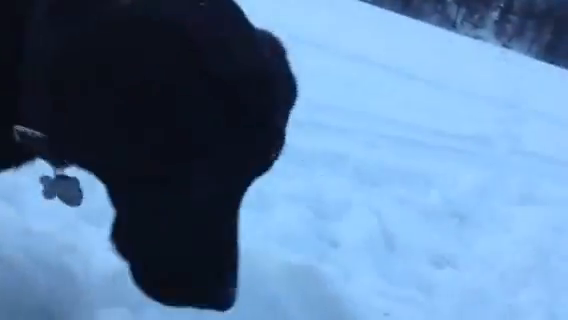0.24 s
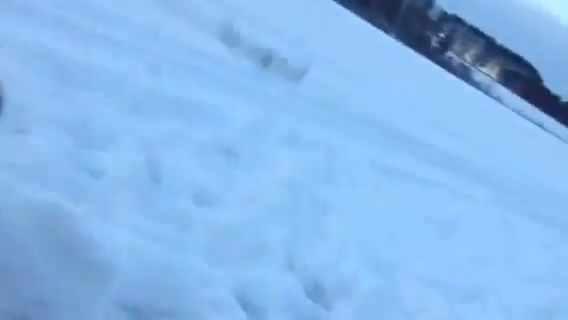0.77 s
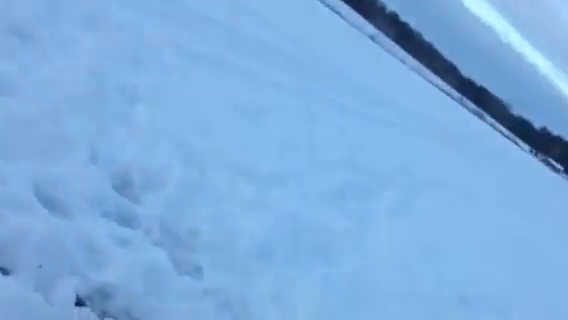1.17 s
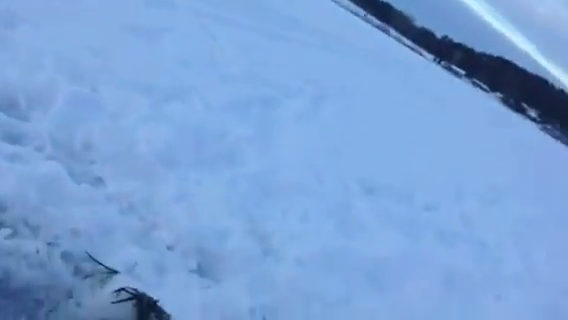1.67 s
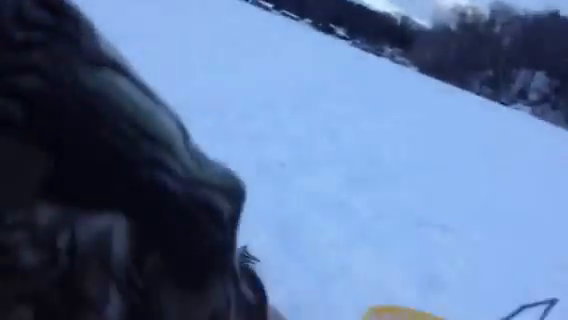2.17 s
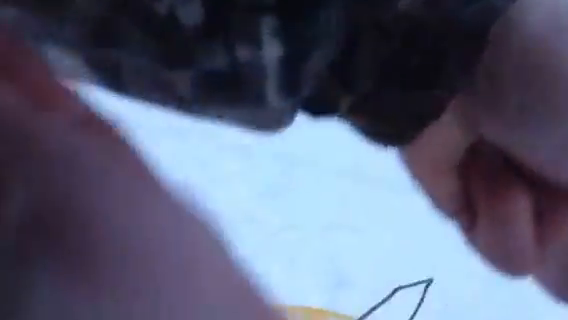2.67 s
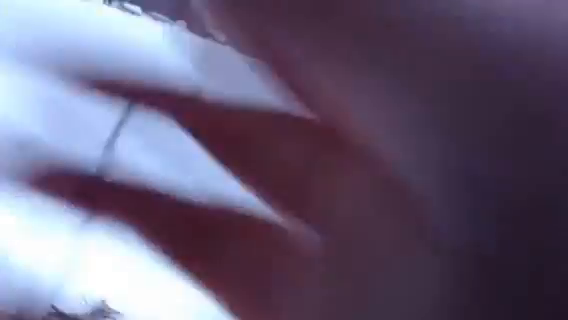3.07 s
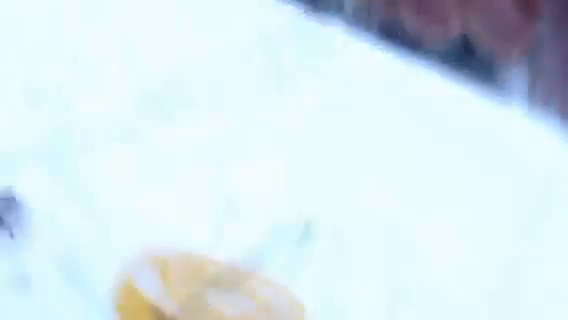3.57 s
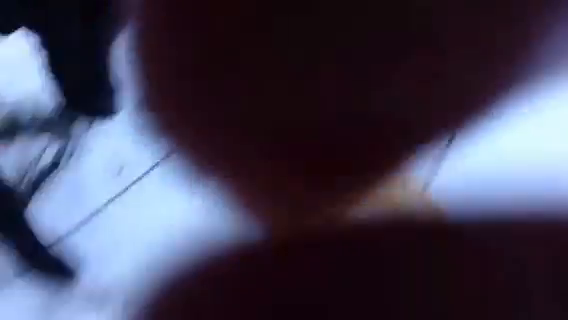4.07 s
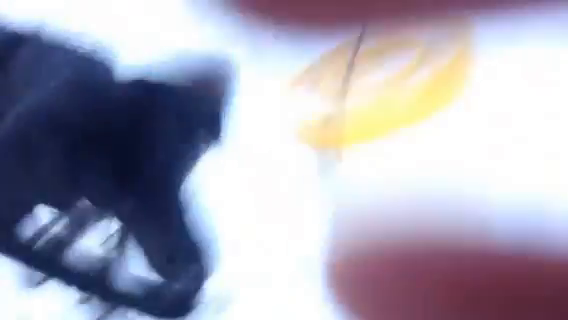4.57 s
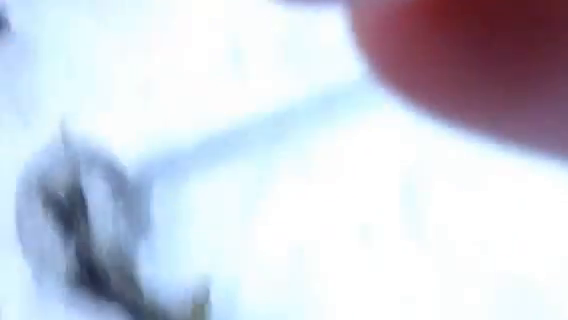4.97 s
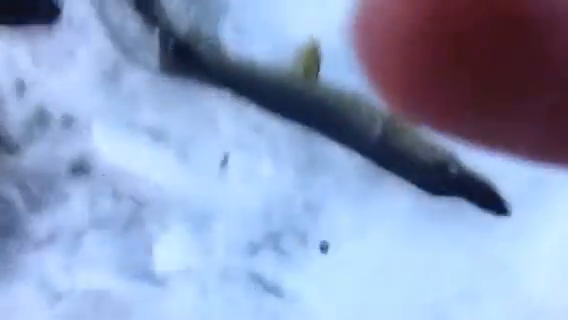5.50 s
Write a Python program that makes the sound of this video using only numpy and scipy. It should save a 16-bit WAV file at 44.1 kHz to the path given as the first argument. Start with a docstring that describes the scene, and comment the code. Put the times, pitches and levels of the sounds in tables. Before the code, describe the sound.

Fingers click and knock on a handheld camera over crunching, squeaking snow, while a dog's collar tags chink now and then.

```python
"""Crusty snow and dog tags

Someone shifts about on crusty snow with a small camera in hand, a dog close by.
Snow crushes in grains of five sizes, snaps and squeaks. Fingers click and knock on the
camera shell, a sleeve drags, and two metal tags on the dog's collar chink now and then."""
import sys
import numpy as np
from scipy import signal
from scipy.fft import rfft, irfft
from scipy.io import wavfile
from scipy.ndimage import uniform_filter1d

SR = 44100
rng = np.random.default_rng(int(sys.argv[2]) if len(sys.argv) > 2 else 0)


def generate_wav(sig):
    """Save sig (samples, or channels by samples) to the path in sys.argv[1] as 16-bit PCM at SR."""
    pcm = np.round(np.clip(np.atleast_2d(sig).T, -1, 1) * 32767).astype(np.int16)
    wavfile.write(sys.argv[1], SR, pcm)


N = 253134


def snow():
    """Snow crushes as clods, crust, coarse crystals, fine crystals and powder."""
    # the five grain sizes: first_hz, last_hz, cycles, grains_per_s, spread_db, clump_db
    sizes = [(184.4, 722, 1.06, 1200, 4, 0), (700, 2770, 5.7, 3000, 1, 2.5),
             (2500, 3880, 0.83, 5000, 1, 1.5), (5060, 7770, 5.7, 16000, -2, 3.5),
             (9000, 7000, 0.8, 8400, 3, 2)]
    # how the four smaller sizes blend the coarse and fine levels: fine_share, offset_db
    blends = [(.02, -0.5), (.45, -2), (.9, -2), (1.2, -3)]
    # the top hiss, duller while fingers lie near the microphone: time_s, offset_db
    powder = [(0, 1.5), (1.4, 1), (1.6, -2.5), (1.9, 0.5), (3.0, -1.5), (3.85, 3), (4.1, -2), (4.55, -3),
              (4.8, 4), (5.74, -1)]
    clods, coarse, fine = crush_levels()
    levels = [clods] + [coarse + share * (fine - coarse) + db for share, db in blends]
    levels[-1] += along(powder)[0]
    return sum(gain_of(db) * grains(*size) for db, size in zip(levels, sizes))


def crush_levels():
    """Clod, coarse and fine levels in dB: at each crunch the crust gives way quickly and settles."""
    # rustle between the crunches: time_s, clods_db, coarse_db, fine_db
    rustle = [(0.0, -51, -35.5, -48), (0.22, -53.5, -40, -53), (0.65, -49.5, -46.5, -51.5),
              (0.88, -50.5, -42.5, -54.5), (1.07, -38, -36.5, -47), (1.53, -45, -47.5, -45),
              (1.74, -46.5, -48.5, -51.5), (1.95, -49, -41.5, -53.5), (2.22, -41, -43.5, -46),
              (2.51, -49.5, -44.5, -51.5), (3.1, -53, -47, -45), (3.34, -49, -39, -37.5),
              (3.71, -42, -43.5, -48), (3.88, -59.5, -45.5, -50.5), (4.12, -49, -44.5, -49),
              (4.27, -49, -38.5, -44), (4.46, -34, -33, -43), (4.59, -62, -58.5, -64),
              (5.1, -75.5, -60, -71.5), (5.74, -58, -52, -56.5)]
    # single crunches and rubs: start_s, hold_s, clods_db, coarse_db, fine_db
    crunches = [(0, 0.016, -50, -34.5, -48), (0.116, 0.066, -37, -33, -39), (0.222, 0.092, -60, -43, -54),
                (0.389, 0.1, -59, -33, -46), (0.707, 0.085, -60, -62, -53),
                (0.846, 0.18, -38.5, -34.5, -47), (.97, 0.057, -39, -30.5, -34),
                (1.053, 0.14, -49, -36.5, -59), (1.26, 0.036, -37.5, -39, -41), (1.34, .095, -46, -41, -42),
                (1.5, 0.054, -44, -47, -39), (1.587, 0.099, -47, -47, -44),
                (1.693, 0.079, -41.5, -37.5, -49), (1.95, 0.056, -49, -55, -40.5),
                (2.037, 0.044, -50, -40.5, -36), (2.202, 0.087, -45, -42.5, -37.5),
                (2.338, 0.069, -67, -60, -40), (2.417, .055, -61, -46, -39), (2.594, .03, -48, -46, -48),
                (2.67, 0.056, -47, -45.5, -37.5), (2.734, 0.061, -51, -36, -36.5),
                (3.012, 0.1, -58, -43, -64), (3.114, .15, -64, -54, -36), (3.286, 0.11, -47, -51, -34),
                (3.428, 0.18, -56, -42, -39.5), (3.673, 0.059, -53.5, -34, -36.5),
                (3.797, 0.1, -49, -50, -36), (4.077, .14, -39.5, -39, -41.5),
                (4.248, 0.11, -42, -46.5, -38.5), (4.343, 0.15, -43.5, -59, -37),
                (4.49, 0.11, -37, -40.5, -35.5), (4.566, 0.014, -29, -42, -30.5),
                (4.742, 0.11, -48.5, -58, -57), (5.01, 0.017, -80, -76, -69), (5.287, 0.023, -58, -68, -68),
                (5.514, .04, -53, -60, -68), (5.687, 0.063, -49, -45.5, -40)]
    attack_s, release_db_per_s = 0.0097, 517
    t = np.arange(N) / SR
    power = gain_of(along(rustle)) ** 2
    for start, hold, *db in crunches:
        rise = np.clip((t - start) / attack_s, 0, 1)
        fall = gain_of(-release_db_per_s * np.maximum(t - start - hold, 0))
        power += (gain_of(db)[:, None] * rise * fall) ** 2
    return 10 * np.log10(power)


def grains(first_hz, last_hz, cycles, per_s, spread_db, clump_db, count=14):
    """Bonds in the snow break: short fading waves at random times, most small, in clumps."""
    clumps = wobble(N, 300)
    size = gain_of(spread_db * np.minimum(rng.exponential(1, N), 5)) * rng.choice([-1, 1], N)
    breaks = size * (rng.random(N) < per_s / SR) * gain_of(clump_db * clumps)
    kind, out = rng.integers(0, count, N), np.zeros(N)
    for k, hz in enumerate(np.geomspace(first_hz, last_hz, count)):
        turns = np.arange(0, 3 * cycles, hz / SR)
        wave = np.sin(2 * np.pi * turns) * np.exp(-2 * turns / cycles) * (1 - np.exp(-3 * turns))
        out += signal.oaconvolve(breaks * (kind == k), wave / np.linalg.norm(wave))[:N]
    return evened(band(out, first_hz * 1.154, last_hz * 2))


def snaps(per_s):
    """Small snaps at random times and pitches, louder when the coarse crunch is loud."""
    when, pitch, size = rng.random((round(per_s * N / SR), 3)).T
    levels = crush_levels()[1][(when * N).astype(int)] + 8.5 - 2 * np.log(size + 0.03)
    rows = [(start, db, hz, 0.69, db - 13, db - 27, 0.66)
            for start, db, hz in zip(when * N / SR, levels, 1500 * 4 ** pitch)]
    return played(rows, click, size=600)


def click(db, hz, ms, dull_db, bright_db, noisy, noise):
    """A quick ring with a rattle around it, a dull push below and a tick above."""
    t = np.arange(len(noise)) / SR
    force, noisy = contact(t, ms), np.clip(noisy, 0, 1)
    tone = np.sin(2 * np.pi * hz * t) * force
    tone += 0.13 * np.sin(2 * np.pi * hz * 0.835 * t) * contact(t, 3.9 * ms)
    rattle = band(noise * force, 1320, 5270)
    ring = peaked((1 - noisy) * peaked(tone) + noisy * peaked(rattle))
    dull = per_burst(band(noise * force, 290, 1570))
    tick = band(noise * contact(t, 0.77 * ms), 5830, 12900)
    bright = per_burst(band(tick, 3300, 16500))
    return gain_of(db) * ring + gain_of(dull_db) * dull + gain_of(bright_db) * bright


def knock(db, hz, thud_db, noise):
    """A soft blow through the hand: a few rough cycles over a faint, low thud."""
    t = np.arange(len(noise)) / SR
    rough = 0.5 * evened(band(noise, hz * 0.19, hz * 2.17))
    force = contact(t, ms=800 / hz)  # rises for 0.8 of a cycle
    blow = peaked(band(force * (np.sin(2 * np.pi * hz * t) + rough), hz / 2, hz * 5))
    thud = contact(t, ms=3.3) * np.sin(2 * np.pi * 90 * t)
    return gain_of(db) * blow + gain_of(thud_db) * thud


def fingers():
    """Fingers click and knock on the camera shell; some clicks are snapping crust."""
    # clicks: start_s, ring_db, pitch_hz, contact_ms, dull_db, bright_db, noisy_share
    clicks = [(0.0164, -14.5, 2490, 1.24, -37, -36, 0.65), (0.0635, -43, 2340, 1.05, -50, -57, 0.5),
              (0.099, -22, 2740, 0.86, -32, -48, 0.4), (0.1268, -15.5, 2370, 0.81, -35, -50, 0.5),
              (0.1356, -22, 1750, 0.7, -34, -27.5, 0.3), (0.177, -13, 1830, 0.74, -43, -48, 0.56),
              (0.218, -28, 4600, 1.05, -40, -34, 0.5), (0.2303, -16, 2700, 0.93, -37, -41, 0.85),
              (0.2695, -13.5, 1503, 1.05, -33, -60, 0.57), (0.285, -25, 1890, 1.05, -44, -55, 0.4),
              (0.4165, -23, 2400, 0.91, -34, -37, 0.8), (0.4524, -11.5, 1890, 1.05, -36, -48, 0.59),
              (0.4764, -14.5, 1900, 1.2, -32, -35, 0.8), (0.5277, -34, 1440, 1.7, -42, -39, 0.5),
              (0.5509, -2.5, 4530, 0.59, -38, -28, 0.3), (0.5608, -21.5, 3070, 1.6, -38, -49, 0.55),
              (0.6758, -39, 1480, 0.87, -58, -37, 0.4), (0.7158, -17.5, 6070, 0.61, -48, -42, 0.4),
              (0.7207, -28, 6860, 1.05, -46, -30.5, 0.4), (0.7528, -24, 5280, 0.61, -54.5, -45, 0.57),
              (0.8411, -27, 1810, 1.3, -45, -36, 0.55), (0.9288, -20.5, 3790, 0.53, -38, -51, 0.3),
              (1.0355, -19, 1530, 1.3, -31, -45, 0.4), (1.072, -30, 2720, 1.05, -27.5, -51, 0.4),
              (1.1506, -31, 1830, 1.2, -45, -56, 0.3), (1.1646, -17, 1900, 0.97, -27.5, -57, 0.3),
              (1.1732, -22, 2940, 0.85, -30, -58, 0.3), (1.206, -37, 1520, 1.2, -26, -58, 0.6),
              (1.227, -12, 1690, 1.1, -25, -57, 0.57), (1.272, -8, 1500, 1.5, -38, -46, 0.63),
              (1.2841, -17, 1930, 1.1, -36, -38, 0.65), (1.3358, -26, 2850, 1.1, -42, -47, 0.7),
              (1.3597, -24, 1870, 1.05, -39, -42, 0.6), (1.4374, -23, 2910, 1.2, -33.5, -44, 0.46),
              (1.504, -29, 3480, 1.05, -52, -43, 0.5), (1.512, -22, 6360, 0.89, -47, -41, 0.53),
              (1.533, -21, 6350, 2.6, -57, -47, 0.76), (1.5536, -18, 4850, 1.2, -34.5, -30, 1),
              (1.6067, -24.5, 2680, 1.1, -47, -35, 0.66), (1.7053, -28, 2840, 0.9, -47, -60, 0.7),
              (1.7628, -25, 2000, 0.76, -26, -62, 0.5), (1.9327, -27, 2430, 0.99, -30.5, -58, 0.75),
              (1.9609, -24, 6180, 2.5, -25.5, -31, 0.63), (1.99, -4, 3120, 1.25, -28, -16, 0.78),
              (1.9963, -18, 4650, 0.83, -50, -41, 0.43), (2.0617, -19, 4030, 1.3, -42, -22, 0.58),
              (2.077, -15, 2830, 1.3, -47, -25, 0.82), (2.1385, -21.5, 1710, 0.67, -30, -47, 0.2),
              (2.2143, -11, 2490, 1.46, -52, -20, 0.82), (2.2821, -25, 3210, 1.05, -33, -44, 0.4),
              (2.3162, -14, 1760, 0.6, -24, -47, 0.1), (2.365, 0, 5210, 0.91, -28, -8.5, 0.58),
              (2.37, -9, 4600, 0.83, -45, -22, 0.7), (2.4053, -18, 4240, 0.88, -44, -29, 0.8),
              (2.5288, -36, 3100, 1.1, -39.5, -44, 0.4), (2.613, -24.5, 2620, 1.05, -45, -36, 0.45),
              (2.6863, -15.5, 1500, 0.73, -48, -30, 0.6), (2.69, -20.5, 6100, 1.05, -54, -45, 0.8),
              (2.7483, -15, 3460, 1.3, -28.5, -53, 0.84), (2.7979, -15.5, 1910, 0.8, -39.5, -48, 0.66),
              (2.8428, -27.5, 4800, 1.05, -52, -38, 0.4), (3.1237, -24, 6600, 1.2, -49, -34, 0.9),
              (3.1707, -34, 6500, 0.84, -40, -33, 0.5), (3.3398, -21, 6500, 1.05, -57, -30, 0.7),
              (3.4498, -14, 5420, 1.3, -25, -21, 0.8), (3.4492, -19.5, 4670, 1, -32, -24, 0.3),
              (3.5474, -23, 3630, 1.05, -44, -34, 0.7), (3.5694, -28, 3650, 1.3, -28, -45, 0.4),
              (3.588, -14, 3620, 1.05, -60, -30, 0.57), (3.678, -34, 6200, 0.82, -36, -29.5, 0.7),
              (3.7139, -17, 4500, 1.2, -25, -42, 0.7), (3.7818, -41, 7060, 0.95, -49, -36, 0.5),
              (3.8016, -20.5, 3220, 1.4, -38, -35, 0.5), (3.8121, -14, 6900, 0.79, -27.5, -26, 0.8),
              (3.8226, -26, 6800, 0.95, -31, -15, 0.7), (3.913, -21, 2230, 0.8, -51, -36, 0.75),
              (4.0923, -33, 1840, 0.71, -27, -50, 0.8), (4.1265, -6.5, 1550, 0.75, -12, -18, 0.28),
              (4.138, -20, 4340, 0.74, -27.5, -43, 0.6), (4.1737, -28, 1820, 1.5, -28, -35, 0.8),
              (4.2416, -18, 5940, 0.78, -30, -22, 0.75), (4.376, -17, 5990, 1.05, -31.5, -36, 0.5),
              (4.3826, -17, 4770, 0.88, -33, -38, 0.3), (4.4456, -23, 5210, 0.7, -31, -34, 0.5),
              (4.502, -25, 6070, 0.73, -28, -48, 0.45), (4.5501, -23, 5760, 2.2, -31, -31, 0.5),
              (4.5624, -19, 5750, 1.4, -22.5, -30, 0.55), (4.5893, -20, 5900, 1.05, -27, -31, 0.5),
              (4.593, -1.5, 5030, 0.6, -13.5, -11, 0.2), (4.5971, -12.5, 6100, 1.5, -25, -27, 0.8),
              (4.7754, -42, 3460, 0.81, -48, -46, 0.65), (4.7864, -42, 2480, 0.73, -38, -49, 0.6),
              (4.835, -37, 1480, 1.05, -43, -46, 0.8), (4.847, -39, 3200, 0.75, -45, -46, 0.4),
              (4.9524, -56, 1960, 0.99, -42, -58, 0.6), (5.023, -43, 7100, 1.05, -71, -47, 0.85),
              (5.107, -45, 6150, 1.2, -70, -48, 0.4), (5.2101, -37, 2060, 1.05, -47, -54, 0.6),
              (5.2995, -37, 7030, 1.7, -63, -43, 0.2), (5.3847, -47, 4840, 1.3, -53, -46.5, 0.3),
              (5.439, -33, 1870, 1.1, -55, -48, 0.84), (5.5704, -29, 4830, 1.2, -62, -38.5, 0.78),
              (5.699, -25.5, 3610, 1.05, -64, -22, 0.3)]
    # dull knocks: start_s, peak_db, pitch_hz, thud_db
    knocks = [(0.029, -33.5, 207, -72), (0.158, -32, 684, -78), (0.454, -24, 390, -83),
              (0.571, -31, 415, -80), (0.643, -37, 336, -67), (0.72, -38, 248, -52), (0.851, -25, 630, -74),
              (0.893, -23, 315, -68), (1.002, -13.5, 328, -62), (1.204, -19, 676, -57),
              (1.227, -13.5, 470, -50), (1.254, -21, 464, -55), (1.288, -35, 280, -58),
              (1.704, -32, 635, -69), (1.758, -35, 680, -71), (1.958, -18, 660, -53),
              (2.019, -33.5, 250, -70), (2.136, -25.5, 315, -67), (2.173, -24.5, 363, -66),
              (2.253, -26, 270, -62), (2.33, -28.5, 296, -68), (2.852, -36, 328, -76),
              (3.175, -32.5, 275, -70), (3.446, -29, 257, -65), (3.567, -32, 665, -46),
              (3.587, -29.5, 219, -52), (3.688, -21, 480, -73), (3.706, -23, 484, -73),
              (3.728, -43, 206, -73), (3.808, -35, 240, -65), (3.858, -29.5, 510, -61),
              (4.092, -30, 540, -55), (4.126, -14, 693, -61), (4.299, -35, 200, -63),
              (4.321, -30.5, 323, -57), (4.43, -20, 290, -61), (4.501, -26, 247, -58),
              (4.588, -25, 154, -47), (4.589, -6, 664, -44), (4.755, -40, 290, -71), (4.786, -38, 230, -69),
              (4.832, -21.5, 498, -67), (4.949, -43, 700, -93), (5.128, -51, 300, -93),
              (5.217, -45, 276, -84), (5.523, -36.5, 640, -64), (5.55, -41, 174, -66)]
    return played(clicks, click, size=1200) + played(knocks, knock, size=3000)


def chink(big_db, small_db, ring_db, chance):
    """Two tags touch and ring until the fur stops them; each tone beats with a weaker twin."""
    # tones of the tags and the ring they hang on: pitch_hz, fade_s (to fall 60 dB), level_db
    big_tag = [(7935, .22, 0), (14365, .08, -17), (15000, .1, -10)]
    small_tag = [(6900, .21, -9), (7080, .2, -2), (12320, .13, 0)]
    split_ring = [(6130, .041, 0)]
    free_s, spread_db = 0.034, 6
    t = np.arange(4000) / SR
    envelope = (1 - np.exp(-t / 0.00028)) / (1 + np.exp((t - free_s) / 0.0078))
    parts = (big_tag, big_db), (small_tag, small_db), (split_ring, ring_db)
    tones = [(hz, fade_s, db + part_db) for part, part_db in parts for hz, fade_s, db in part]
    out = np.zeros(len(t))
    for (hz, fade_s, db), (shift, strike) in zip(tones, chance.reshape(-1, 2)):
        tone = np.sin(2 * np.pi * (hz * t + shift))
        twin = 0.55 * np.sin(2 * np.pi * hz * (0.992 + 0.016 * shift) * t)
        out += gain_of(db + spread_db * (strike - 0.5) - 60 * t / fade_s) * (tone + twin)
    return envelope * out


def scuff(db, hz, length_s, octaves, noise):
    """A gritty rub that swells and dies away."""
    age = np.arange(len(noise)) / SR / np.clip(length_s, 0.005, 0.08)
    swell = (2 * age * np.exp(1 - 2 * age)) ** 2.2
    grit = noise * abs(noise[::-1]) ** 0.88
    spread = 2 ** (np.clip(octaves, 0.2, 4) / 2)
    edges = hz / spread, hz * spread
    return gain_of(db) * evened(band(band(grit, *edges), *edges)) * swell


def squeak(length_s, start_hz, end_hz, db, noise):
    """Rapid slips ring a pocket of snow whose pitch glides as it is squeezed."""
    count = max(round(length_s * SR), 60)
    hz = np.linspace(start_hz, end_hz, count)
    rough = evened(resonate(noise[:count], hz, width_hz=160))
    slips = np.sin(2 * np.pi * np.cumsum(hz) / SR) + 0.43 * rough
    return gain_of(db) * evened(slips) * np.hanning(count) ** 0.59


def sleeve_drag():
    """A sleeve catches unevenly on something hard and rings it. Gives start time and sound."""
    # the stroke: time_s, level_db, pitch_factor
    stroke = [(3.08, -70, .99), (3.13, -44, .99), (3.2, -42, .99), (3.3, -40, 1.), (3.4, -40, 1.01),
              (3.47, -43, 1.), (3.54, -43, 1.), (3.6, -70, 1.)]
    # the tones it rings: pitch_hz, width_hz, level_db
    tones = [(2600, 100, 8), (3030, 90, -18), (3600, 120, -15), (4430, 90, -17), (5150, 130, -12),
             (5760, 80, -15), (6300, 80, -10), (6640, 61, 3), (7360, 90, -11), (7840, 100, 11),
             (8330, 100, 7)]
    times, db, factor = np.transpose(stroke)
    t = np.arange(times[0], times[-1], 1 / SR)
    out, bend = np.zeros(len(t)), np.interp(t, times, factor)
    for hz, width_hz, tone_db in tones:
        grit = gain_of(3 * wobble(len(t), 500)) * rng.standard_normal(len(t))
        out += gain_of(tone_db) * evened(resonate(grit, hz * bend, width_hz))
    return times[0], evened(out) * gain_of(np.interp(t, times, db))


def cupped_hand():
    """A faint, lumpy rustle, coloured by the hollow of fingers cupping the microphone."""
    # its loudness: time_s, level_db
    loudness = [(4.62, -90), (4.8, -51.5), (5.0, -61), (5.2, -63), (5.4, -53.5), (5.55, -53.5), (5.68, -53),
                (5.74, -62)]
    # its colour: pitch_hz, gain_db
    colour = [(300, -40.5), (800, -16), (1500, -4), (2200, -3.5), (2700, -19), (3100, -48), (3800, -6.5),
              (4900, -7), (5500, -15), (6100, -21), (7000, -7.5), (9000, -19), (15000, -33)]
    lumps_db = wobble(N, 400)
    noise = evened(coloured(rng.standard_normal(N), colour))
    return noise * gain_of(along(loudness)[0] + lumps_db)


def air():
    """A very quiet, steady background noise."""
    # its colour: pitch_hz, gain_db
    colour = [(35, -53), (60, -40), (215, -24), (334, 18), (411, -17), (685, 29), (1190, -56), (1990, 13),
              (2950, -32), (3990, -32), (5650, -52), (7990, 14), (15300, -40)]
    return gain_of(-68) * evened(coloured(rng.standard_normal(N), colour))


def gain_of(db):
    """Turns decibels into a multiplier."""
    return 10 ** (np.asarray(db) / 20)


def evened(x):
    """Scales to an average (rms) level of 1."""
    return x / np.sqrt(np.mean(x ** 2) + 1e-20)


def peaked(x):
    """Scales to a peak of 1."""
    return x / (abs(x).max() + 1e-12)


def per_burst(x):
    """Scales a short sound to the energy of 4 ms at level 1."""
    return x / np.sqrt(np.sum(x ** 2) / (SR / 250) + 1e-20)


def wobble(count, width):
    """A random curve, smoothed over width samples."""
    return evened(uniform_filter1d(uniform_filter1d(rng.standard_normal(count), width), width))


def contact(t, ms):
    """Force of a short touch: rises for ms, then falls away."""
    age = t * 1000 / np.clip(ms, 0.15, 12)
    return age * np.exp(1 - age)


def band(x, lo_hz, hi_hz):
    """Softens everything outside two frequencies."""
    return signal.sosfilt(signal.butter(2, [lo_hz, min(hi_hz, 20000)], "band", fs=SR, output="sos"), x)


def coloured(x, points):
    """Shapes the tone with (pitch_hz, gain_db) points."""
    pitches, db = np.transpose(points)
    hz = np.fft.rfftfreq(len(x), 1 / SR)
    return irfft(rfft(x) * gain_of(np.interp(np.log(hz + 1), np.log(pitches + 1), db)), len(x))


def resonate(x, hz, width_hz):
    """Rings at a moving pitch: shifts it down to zero, smooths, and shifts back."""
    turn = np.exp(2j * np.pi * np.cumsum(hz) / SR)
    decay = np.exp(-np.pi * width_hz / SR)
    return 2 * (turn * signal.lfilter([1 - decay], [1, -decay], x / turn)).real


def along(points):
    """Joins (time_s, value, ...) rows by straight lines, one curve for each value."""
    times, *columns = np.transpose(points)
    return [np.interp(np.arange(N) / SR, times, column) for column in columns]


def add(mix, start_s, sound):
    """Mixes a sound in at its start time."""
    part = mix[max(round(start_s * SR), 0):][:len(sound)]
    part += sound[:len(part)]


def played(table, voice, size, draw=rng.standard_normal):
    """Plays every row of a table, giving each its own size random numbers."""
    out = np.zeros(N)
    for (start_s, *row), chance in zip(table, draw(size=(len(table), size))):
        add(out, start_s, voice(*row, chance))
    return out


def scene():
    """Mixes all the sources into one channel."""
    # short rubs: start_s, level_db, pitch_hz, length_s, width_octaves
    scuffs = [(.40, -31, 3020, 0.011, 1.7), (.85, -31.5, 1630, 0.13, 0.79), (.98, -25.5, 590, 0.047, 0.63),
              (1.04, -29, 2500, 0.013, 1.1), (2.215, -34, 12400, 0.02, 0.43),
              (2.435, -29, 4040, 0.022, 2.5), (2.68, -31, 4900, 0.03, 4.5), (3.445, -25, 6300, 0.018, 2.4),
              (3.52, -35, 2870, 0.016, 0.62), (4.365, -26, 5200, 0.029, 0.78),
              (4.43, -35, 4950, 0.022, 0.52), (4.545, -30, 5760, 0.011, 0.3),
              (4.573, -25, 5550, 0.0071, 0.74), (4.584, -17, 6300, 0.017, 0.77),
              (5.69, -31.5, 7100, 0.057, 2.3)]
    # packed snow and taut cloth under load: start_s, length_s, start_hz, end_hz, level_db
    squeaks = [(.01, 0.011, 2646, 2500, -23), (.03, 0.011, 2500, 2500, -33), (.052, 0.047, 877, 1200, -44),
               (.09, 0.031, 585, 840, -34), (.128, 0.016, 1320, 1400, -24.5),
               (.136, 0.011, 1646, 1890, -23.5), (.155, 0.019, 670, 700, -35),
               (.21, 0.014, 600, 700, -36.5), (.224, 0.012, 1346, 1620, -29.5),
               (.232, 0.071, 533, 830, -34.5), (.237, 0.0085, 2750, 2400, -33),
               (.267, 0.023, 738, 1145, -27), (.268, 0.012, 1560, 1550, -29),
               (.282, 0.015, 1290, 1400, -29), (.282, .01, 1910, 1950, -35),
               (.293, 0.015, 2270, 2190, -33.5), (.34, 0.061, 970, 1210, -46), (.42, 0.01, 1400, 1500, -31),
               (.455, 0.012, 1257, 1326, -14), (.53, 0.018, 1220, 1310, -33),
               (3.2, 0.069, 2412, 2514, -37.5), (3.225, 0.021, 5394, 5355, -37),
               (3.275, 0.082, 2575, 2620, -36), (3.305, .055, 3470, 3490, -42),
               (3.355, 0.072, 2600, 2710, -39), (3.375, 0.045, 3740, 3730, -36.5),
               (3.455, 0.038, 3680, 3720, -36), (3.515, 0.027, 2380, 2440, -30.5),
               (3.52, 0.031, 3550, 3600, -37), (4.586, 0.0071, 6150, 5700, -33)]
    # the collar tags touch: start_s, big_tag_db, small_tag_db, ring_db
    chinks = [(.722, -36, -32, -48), (.745, -44, -52.5, -70), (1.96, -38, -47, -37), (2.166, -48, -46, -39),
              (2.7, -38, -31.5, -60), (3.187, -29, -70, -70), (3.212, -23, -70, -39),
              (3.305, -40, -70, -70), (3.355, -67, -37, -70), (3.679, -32, -33, -46),
              (3.783, -27, -31, -70), (3.824, -26, -33, -39), (3.853, -36, -28, -73), (3.92, -55, -70, -70),
              (4.002, -45, -39, -70), (4.068, -43, -70, -70), (4.127, -46, -37, -70),
              (4.26, -40, -51.5, -70), (4.273, -20, -46, -70), (4.997, -62, -54, -80),
              (5.025, -41.5, -39, -61), (5.106, -64, -48, -73), (5.283, -58, -55, -78),
              (5.301, -48, -42.5, -80)]
    mix = air() + fingers()
    mix += played(scuffs, scuff, size=8000) + played(squeaks, squeak, size=4000)
    add(mix, *sleeve_drag())
    mix += played(chinks, chink, size=14, draw=rng.random)
    return (mix + cupped_hand() + snow() + snaps(per_s=21))[None]


def record(dry):
    """The microphone colours the sound, rounds off loud peaks and loses the highest treble."""
    # microphone colour: pitch_hz, gain_db
    colour = [(40, -6), (90, -8.5), (160, 0), (400, -4), (1300, -3.5), (5000, 0), (9000, -2), (10000, -10),
              (11500, -8.5), (15000, 5.5)]
    ceiling, step_hz, step_db, edge_hz = 0.82, 15350, -29, 16600
    heard = coloured(dry[0], colour)
    rounded = heard / (1 + (heard / ceiling) ** 6) ** (1 / 6)
    step, edge = (signal.firwin(511, hz, window=("kaiser", 9), fs=SR) for hz in (step_hz, edge_hz))
    low = signal.oaconvolve(rounded, step, "same")
    stepped = low + gain_of(step_db) * (rounded - low)
    return signal.oaconvolve(stepped, edge, "same")[None]


dry = scene()
out = record(dry)
generate_wav(out)
```